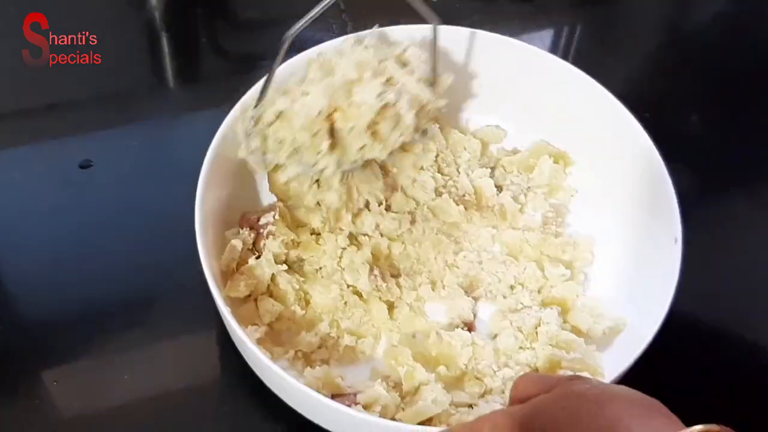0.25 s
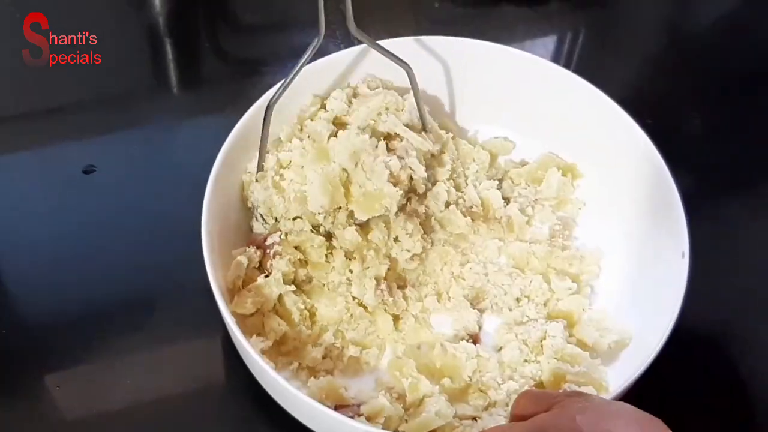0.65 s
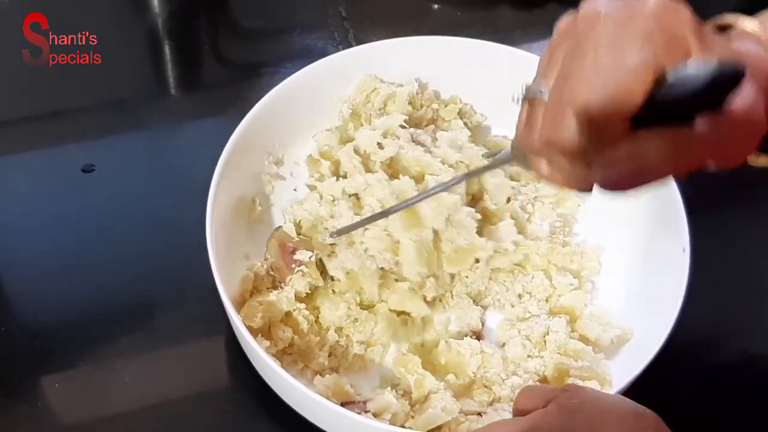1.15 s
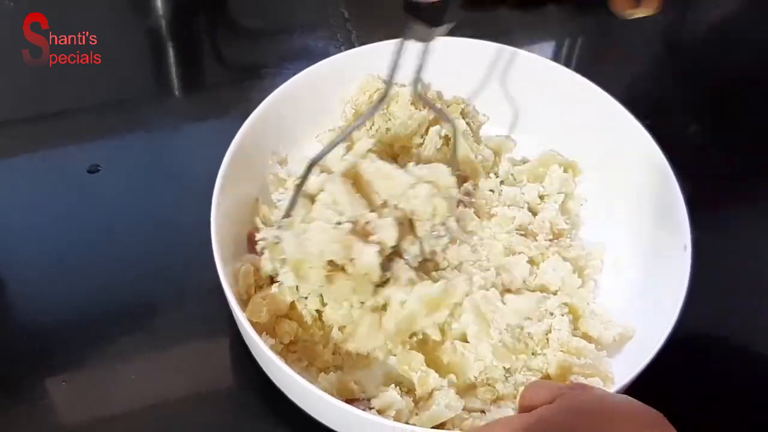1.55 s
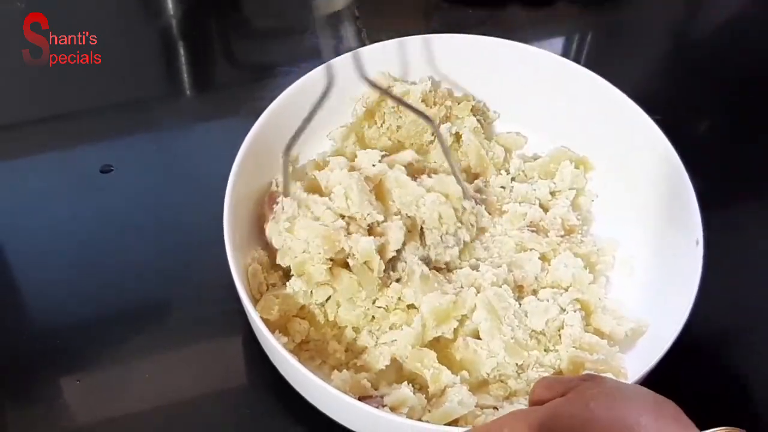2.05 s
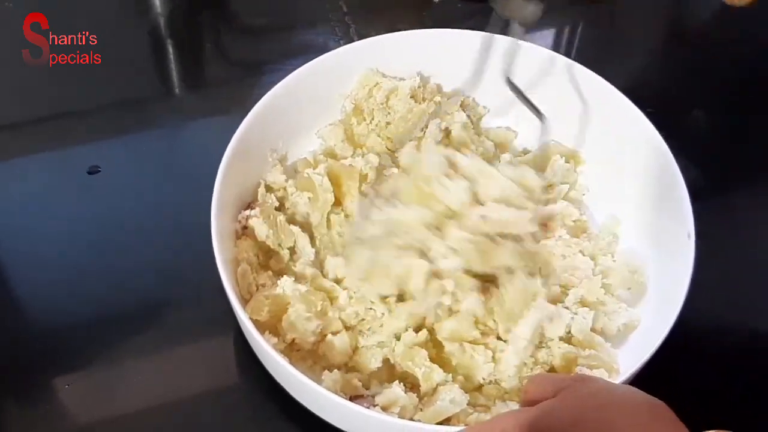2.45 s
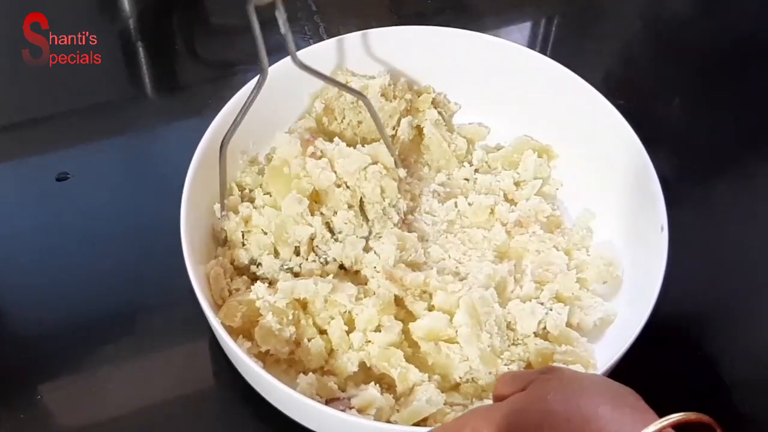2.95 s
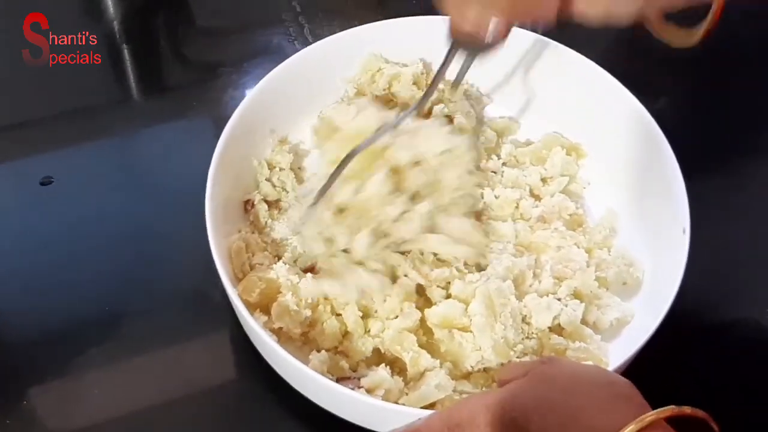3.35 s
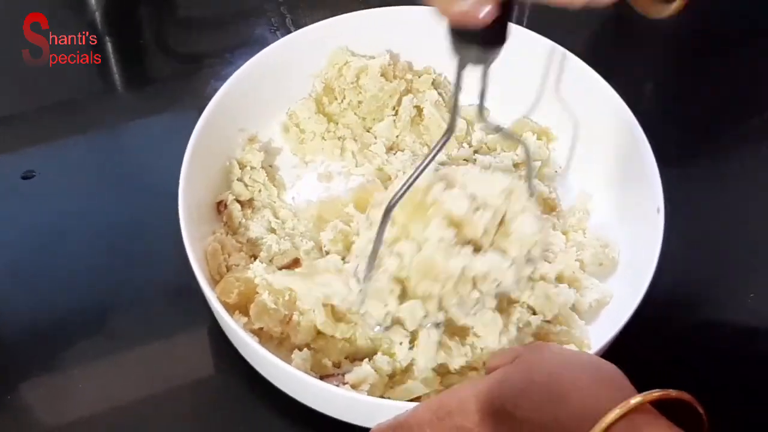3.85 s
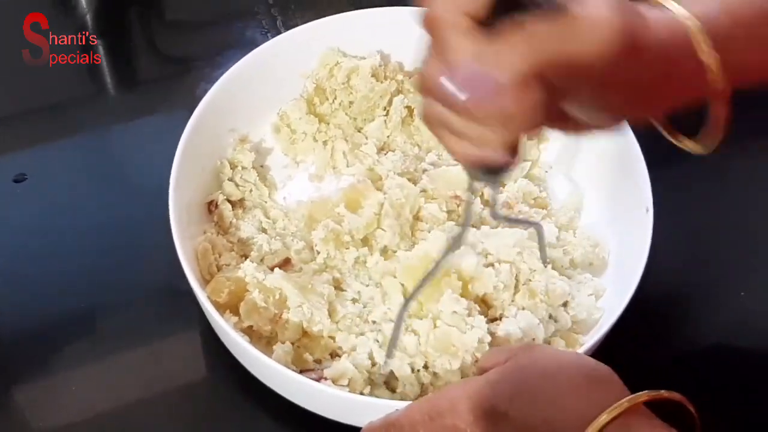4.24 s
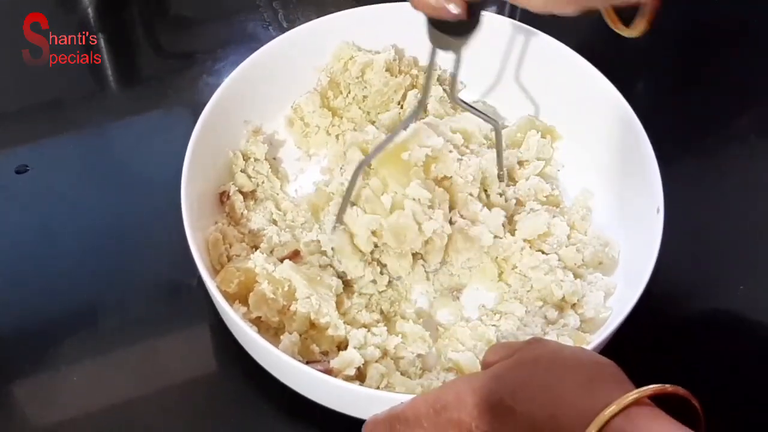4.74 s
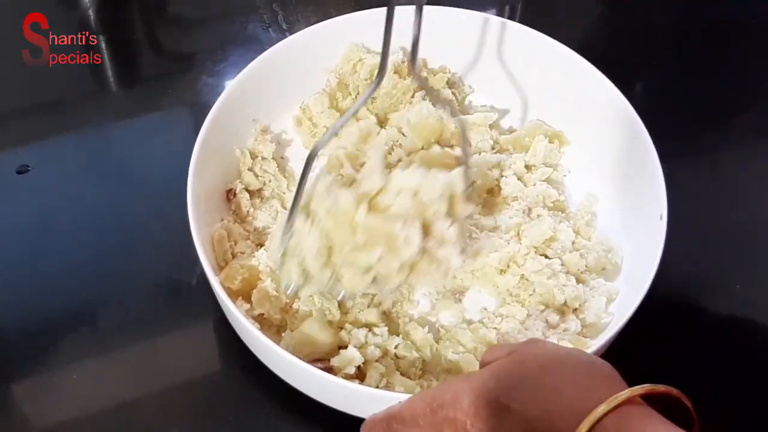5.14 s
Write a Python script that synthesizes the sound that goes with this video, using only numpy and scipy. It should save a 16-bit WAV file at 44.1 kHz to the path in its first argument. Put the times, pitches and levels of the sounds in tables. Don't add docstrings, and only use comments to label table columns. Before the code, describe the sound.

Potato mashing in a bowl: an early clack, quiet wet scrapes with faint bird whistles, then increasingly loud hollow knocks and a glaze squeak.

```python
import sys
import numpy as np
from scipy import signal
from scipy.io import wavfile
from scipy.ndimage import uniform_filter1d

SR = 44100
rng = np.random.default_rng(int(sys.argv[2]) if len(sys.argv) > 2 else 0)


def output_pcm(signal):
    pcm = np.clip(np.atleast_2d(signal).T, -1, 1) * 32767
    wavfile.write(sys.argv[1], SR, np.round(pcm).astype(np.int16))


def volts_from_decibels(level):
    exponent = np.asarray(level, float) / 20
    return 10 ** exponent


N = 237872


def rms_one(x):
    return x / np.sqrt(np.mean(x ** 2) + 1e-20)


def lean_left(db):
    return volts_from_decibels([[db], [-db]])


def at_hz(points, hz):
    point_hz, value = np.transpose(points)
    return np.interp(np.log(hz), np.log(point_hz), value)


def drift(rate):
    hop, settle = 40, 2000
    r = np.exp(-2 * np.pi * rate * hop / SR)
    white = rng.standard_normal(N // hop + settle + 2)
    slow = signal.lfilter([1], [1, -2 * r, r * r], white)[settle:]
    return np.interp(np.arange(N) / hop, np.arange(len(slow)), rms_one(slow))


def swells(rows, rise_db_s, fall_db_s):
    t = np.arange(0, N + 40, 40) / SR
    power = 0
    for s, hold, db in rows:
        early = np.maximum(s - t, 0)
        late = np.maximum(t - s - hold, 0)
        power = power + volts_from_decibels(db - rise_db_s * early - fall_db_s * late) ** 2
    return np.interp(np.arange(N) / SR, t, 10 * np.log10(power + 1e-14))


def resonate(x, hz, width_hz):
    r = np.exp(-np.pi * width_hz / SR)
    zeros = np.array([1, 0, -1]) * (1 - r * r) / 2
    poles = [1, -2 * r * np.cos(2 * np.pi * hz / SR), r * r]
    return signal.lfilter(zeros, poles, x + 1e-18)


def soften(x, low_hz, high_hz):
    return signal.sosfilt(signal.butter(2, [low_hz, high_hz], "band", fs=SR, output="sos"), x)


BAND_EDGES = 25 * 2 ** np.arange(0, 9.6, .5)


def stereo_bands(size, likeness, gain_at):
    out, white = 0, rng.standard_normal((2, 2, size))
    for k, (low, high) in enumerate(zip(BAND_EDGES, BAND_EDGES[1:])):
        mid, side = soften(white[k % 2], low, high)
        hz = np.sqrt(low * high)
        alike = np.clip(at_hz(likeness, hz), -1, 1)
        pair = np.sqrt(1 + alike) * mid + np.sqrt(1 - alike) * side * [[1], [-1]]
        out = out + gain_at(hz) * pair
    return out


# frequency in Hz, level in dB per Hz.
FLOOR = [(20, -40.5), (45, -18), (100, -17), (250, -3.5), (400, -24), (650, -37.5), (1200, -30.5),
         (2000, -33), (3000, -63.5), (6000, -58), (8500, -74.5), (13000, -47.5), (16000, -39.5)]
# frequency in Hz, likeness from 0 to 1.
FLOOR_LIKENESS = [(60, 1), (240, 0.99), (950, 0.28), (3770, 0.06), (15000, 0.124)]
# frequency in Hz, width in Hz, level in dB.
RUMBLE = [(55, 2.8, -77.5), (96.6, 3.9, -66), (161.2, 3.5, -60.5), (236.3, 5.5, -60.5), (286, 8, -78)]
# frequency in Hz, width in Hz, level in dB.
FAN = [(1200, 120, -84), (1980, 160, -79)]


def background():
    floor = stereo_bands(N, FLOOR_LIKENESS, lambda hz: volts_from_decibels(at_hz(FLOOR, hz)))
    broad = volts_from_decibels(-57.5) * rms_one(floor)
    common, apart = rng.standard_normal(N), rng.standard_normal((2, N))
    feed = common + 1.1 * apart
    hum = sum(volts_from_decibels(db) * rms_one(resonate(feed, hz, width)) for hz, width, db in RUMBLE + FAN)
    return lean_left(1.5) * (broad + hum)


# start in seconds, hold in seconds, level in dB.
MASH = [(0.0, 0.63, -69.5), (.9, 0.09, -61), (1.95, .05, -71.5), (2.1, .16, -66), (2.83, 0.063, -64.5),
        (3.05, 0.089, -67.5), (3.2, 0.071, -66), (3.4, 0.023, -66), (3.8, 0.076, -68.5), (4.33, 0.077, -61),
        (4.92, .02, -62), (5.3, 0.12, -73)]
# frequency in Hz, level in dB per Hz.
SQUELCH = [(1470, -41), (2500, -11), (3130, -10), (3860, -2.5), (5480, -3.5), (12200, -3.5), (16000, -4.5)]
# frequency in Hz, likeness from 0 to 1.
ROOM_LIKENESS = [(150, .9), (400, 0.87), (1000, 0.12), (10000, 0.054)]


def squelch():
    flicker = drift(15)
    noise = stereo_bands(N, ROOM_LIKENESS, lambda hz: volts_from_decibels(at_hz(SQUELCH, hz) + 1.2 * flicker))
    level_db = swells(MASH, rise_db_s=116, fall_db_s=119)
    return volts_from_decibels(level_db + 0.5) * rms_one(noise)


def slip_noise(level_db, resonances):
    slips = rng.standard_normal((2, N))
    wall = 0
    for hz, width, db in resonances:
        wall = wall + volts_from_decibels(db + 1.3 * drift(1.3)) * rms_one(resonate(slips, hz, width))
    return volts_from_decibels(level_db) * rms_one(wall)


# start in seconds, hold in seconds, singing in dB, dry scrape in dB.
RUBBING = [(.06, .06, -74, -60), (.82, .06, -89, -75), (0.967, 0.069, -83, -55),
           (1.272, 0.028, -80.5, -77.5), (2.099, 0.046, -73, -72), (2.292, 0.16, -64, -68),
           (2.566, .1, -63, -62), (2.72, 0.081, -60.5, -56), (3.144, 0.12, -72, -56.5),
           (3.422, 0.021, -57, -54.5), (3.617, 0.054, -59.5, -62.5)]
# frequency in Hz, width in Hz, level in dB.
SINGING = [(850, 57, 5.5), (1144, 22, 6.5)]
# frequency in Hz, width in Hz, level in dB.
SCRAPE = [(753, 400, -9), (1210, 140, 13.5), (2050, 220, 10)]


def rubbing():
    s, hold, singing, scraping = np.transpose(RUBBING)
    idle_db = -82.5

    def stroke_db(db):
        strokes = np.transpose([s, hold, db])
        return np.maximum(swells(strokes, rise_db_s=103, fall_db_s=134), idle_db)

    song = slip_noise(stroke_db(singing) + 2.5, SINGING)
    scrape = slip_noise(stroke_db(scraping) - 8.0, SCRAPE)
    return song + scrape


def struck(modes, times, levels_db, spread_db, rattle_s=0):
    at, out = np.round(times * SR).astype(int), np.zeros(N)
    chance = rng.standard_normal((len(at), len(modes)))
    wires = rng.standard_normal(N)
    for k, (hz, mode_db, t60) in enumerate(modes):
        clicks = np.zeros(N)
        strength = volts_from_decibels(levels_db + mode_db + spread_db * chance[:, k])
        np.add.at(clicks, at, strength * (-1) ** k)
        if rattle_s:
            fade = np.exp(-1 / (rattle_s * SR))
            clicks = wires * signal.lfilter([np.sqrt(1 - fade ** 2)], [1, -fade], clicks + 1e-18)
        r, w = volts_from_decibels(-60 / (max(t60, .0005) * SR)), 2 * np.pi * hz / SR
        out += signal.lfilter([0, np.sin(w)], [1, -2 * r * np.cos(w), r * r], clicks + 1e-18)
    return out


# start in seconds, bowl body in dB, weight passed to the counter in dB,
# hardness of contact in dB.
BLOWS = [(0.127, -70, 13.5, 16), (0.151, -39.5, -37, 9), (0.291, -36.5, -5, -34), (0.341, -26.5, -5, 13),
         (1.58, -51, 2.5, -29), (1.595, -48, -3.5, -22.5), (2.138, -74.5, 1.5, 16.5),
         (2.708, -35.5, 0, -12.5), (2.763, -42.5, -10, -0.5), (3.389, -30.5, -7.5, -15),
         (3.657, -16, -11.5, -10), (3.718, -27, -3.5, -8), (3.768, -27, -10, -18),
         (3.868, -19.5, -10.5, -7), (4.108, -11.5, -16, -4.5), (4.566, -23.5, -5.5, -10),
         (4.589, -25.5, -17.5, -9.5), (4.655, -7, -11, -9), (4.692, -36.5, 9, -0.5),
         (4.906, -33.5, -30, 2.5), (4.951, -11, -7.5, -4.5), (4.956, -41.5, -4, 6),
         (5.25, -21.5, -10, -15.5)]
# frequency in Hz, level in dB, t60 in seconds.
THUD = [(99, -35, 0.14), (170.5, -7.5, 0.07), (251, -1.5, 0.021), (313.2, 1.5, 0.074), (391.6, -4.5, 0.12),
        (467, -2.5, 0.07)]
# frequency in Hz, level in dB, t60 in seconds.
BODY = [(608, -4, 0.025), (690, 2.5, 0.016), (808, -6, 0.043), (910, -5, 0.024), (1033.6, -7.5, 0.09),
        (1157, 2, 0.0092), (1304.5, -0.5, 0.027)]
# frequency in Hz, level in dB, t60 in seconds.
RIM = [(1479, -2.5, 0.0095), (1751, 0, 0.0051), (1964, 0, 0.0087), (2400, -0.5, 0.0025),
       (2872, -4.5, 0.006), (2920, -0.5, 0.00088)]
# frequency in Hz, level in dB, t60 in seconds.
CRACK = [(3900, 0.5, 0.0018), (5300, 2, 0.0012), (6464, -1, 0.0015), (7670, -3.5, 0.00092),
         (11700, -6, 0.00089), (12960, -10, 0.00033)]


def blows():
    s, body_db, weight_db, hard_db = np.transpose(BLOWS)
    crack_per_hardness = 2.003
    thud = struck(THUD, s, body_db + weight_db - 6.5, spread_db=0.5)
    body = struck(BODY, s, body_db - 7.5, spread_db=1.5)
    rim = struck(RIM, s, body_db + hard_db + 5.0, spread_db=1.0)
    crack = struck(CRACK, s, body_db + crack_per_hardness * hard_db, spread_db=0.0, rattle_s=0.0035)
    low = soften(thud, 75, 912) + soften(body, 270, 1600)
    return low + soften(rim, 1300, 7100) + soften(crack, 4180, 16500)


def damped_sines(rows):
    out, t = np.zeros(N), np.arange(SR // 2) / SR
    for s, hz, db, t60 in rows:
        at = round(s * SR)
        envelope = volts_from_decibels(db - 60 * t / max(t60, .001)) * np.minimum(hz * t, 1)
        out[at:at + len(t)] += (envelope * np.sin(2 * np.pi * hz * t))[:N - at]
    return out


# start in seconds, level in dB.
BOOMS = [
    (.13, -40),
    (0.398, -34.5),
    (4.121, -37),
    (4.96, -45),
]


def booms():
    return damped_sines([(s, 106, db, 0.083) for s, db in BOOMS])


# start in seconds, frequency in Hz, level in dB,
# t60 in seconds.
SPOTS = [(.152, 2600, -17, 0.0071), (.152, 2130, -28, 0.027), (.341, 2050, -21, 0.024),
         (.341, 2400, -28.5, 0.069), (.341, 1660, -39, 0.02), (.341, 15520, -31.5, 0.044),
         (2.707, 365, -39, 0.078), (2.707, 910, -41.5, 0.088), (3.392, 394.6, -40, 0.17),
         (3.392, 910, -46, 0.14), (3.606, 700, -50, 0.057), (3.659, 298, -32.5, 0.1),
         (3.767, 387, -27.5, 0.1), (3.868, 653, -15, 0.031), (4.109, 743, -13.5, 0.02),
         (4.109, 566, -22, 0.086), (4.109, 3900, -23.5, 0.023), (4.567, 668, -24, 0.047),
         (4.59, 690, -33.5, 0.057), (4.655, 727, -4, 0.017), (4.66, 908, -19, 0.093),
         (4.66, 564, -24.5, 0.14), (4.689, 910, -15, 0.0059), (4.9075, 1955, -19.5, 0.015),
         (4.9075, 3700, -29.5, 0.0095), (4.951, 760, -10, 0.031), (4.956, 584, -13, 0.022),
         (4.9557, 3240, 0, 0.0018), (4.956, 2100, -18, 0.0046), (5.251, 392, -30.5, 0.17)]


def spots():
    return damped_sines(SPOTS)


# start in seconds, level in dB.
PINGS = [
    (0.34, -35),
]
# frequency in Hz, level in dB, t60 in seconds.
WIRE = [(4000, 6.5, 0.045), (4800, -9.5, 0.098), (5840, 9, 0.0083), (6300, -3, 0.14), (7800, 9, 0.11),
        (10600, 11, 0.02), (11926, 0.5, .05), (13200, -1.5, 0.073)]


def pings():
    return struck(WIRE, *np.transpose(PINGS), spread_db=2.0)


# start in seconds, length in seconds, starting frequency in Hz, level in dB.
BIRD = [
    (0.602, 0.08, 3900, -63.5),
    (0.813, .11, 3920, -57.5),
    (0.919, 0.09, 4010, -60),
    (1.04, 0.079, 3900, -60),
    (1.256, 0.1, 3900, -65.5),
    (1.487, 0.096, 3950, -68),
    (1.771, 0.057, 3800, -72.5),
    (2.39, 0.069, 3840, -73),
]


def bird():
    out, sag_hz_s = np.zeros(N), 3940
    for s, length, start_hz, db in BIRD:
        hz = np.linspace(start_hz, start_hz - sag_hz_s * length, round(length * SR))
        whistle = np.sin(2 * np.pi * np.cumsum(hz) / SR)
        out[round(s * SR):][:len(hz)] += volts_from_decibels(db) * np.sqrt(np.hanning(len(hz))) * whistle
    return out * (0.27 + 0.33 * drift(146))


# frequency in Hz, level in dB, t60 in seconds.
CLINK = [(1594, -43, 0.082), (2194, -38, 0.032), (2600, -49.5, 0.048), (3210, -58.5, 0.078),
         (4150, -54.5, 0.045), (4950, -66, 0.17), (5180, -54.5, 0.1), (9250, -76, 0.071)]


def clink():
    return damped_sines([(2.764, *mode) for mode in CLINK])


# start in seconds, hold in seconds, level in dB.
DRAG = [
    (3.16, 0.068, -54.5),
]
# frequency in Hz, width in Hz, level in dB.
DRAGGED = [(715, 400, -1), (920, 220, -1), (2600, 2000, -8)]


def drag():
    return slip_noise(swells(DRAG, rise_db_s=500, fall_db_s=141) - .3, DRAGGED)


# start in seconds, hold in seconds, level in dB.
SQUEAK = [
    [(4.25, 0.04, -46.5), (4.33, .06, -59), (4.43, 0.017, -60.5), (4.51, 0.13, -45)],
    [(4.38, 0.0039, -50.5), (4.415, 0.02, -46.5), (4.475, 0.014, -59), (4.495, 0.085, -54.5)],
]
SQUEAK_HZ = (1170, 1762)


def squeak():
    noise, out = rng.standard_normal(N), 0
    for rows, hz in zip(SQUEAK, SQUEAK_HZ):
        level_db = swells(rows, rise_db_s=910, fall_db_s=699) - 8.5
        out = out + volts_from_decibels(level_db) * rms_one(resonate(resonate(noise, hz, 75), hz, 102))
    return out


# frequency in Hz, t60 in seconds.
ROOM_T60 = [(150, 0.47), (400, 0.35), (1200, 0.37), (3600, 0.31), (10000, 0.29)]


def kitchen(x):
    t = np.arange(int(.9 * SR)) / SR
    tail = stereo_bands(len(t), ROOM_LIKENESS, lambda hz: volts_from_decibels(-60 * t / at_hz(ROOM_T60, hz)))
    build_up = np.clip((t - .002) / 0.0017, 0, 1)
    tail *= build_up * (1 + 0.2 * np.exp(-t / 0.053))
    tail /= np.sqrt(np.sum(tail ** 2, axis=1, keepdims=True))
    return signal.fftconvolve(x[None], tail, axes=1)[:, :N]


def shifting_kitchen(x, count=3):
    starts = np.array(BLOWS)[:, 0] - .003
    place = np.searchsorted(starts, np.arange(N) / SR) % count
    return sum(kitchen(x * uniform_filter1d(1. * (place == k), size=120)) for k in range(count))


def scene():
    bowl = soften(blows() + pings() + squeak(), 60, 16000)
    near = soften(booms() + spots() + clink(), 60, 22000)
    outside = bird()
    direct = lean_left(1.5) * (bowl + near + outside)
    to_room = bowl + .5 * near + 0.66 * outside
    room = volts_from_decibels(6.5) * lean_left(1.2) * shifting_kitchen(to_room)
    return direct + room + squelch() + rubbing() + drag() + background()


def top_cut(x):
    return signal.sosfilt(signal.butter(12, 17430, fs=SR, output="sos"), x)


def record(dry):
    low_pass = signal.ellip(10, .5, 50, 15850, fs=SR, output="sos")
    mix = signal.sosfilt(low_pass, dry)
    return top_cut(mix)


dry = scene()
out = record(dry)
output_pcm(out)
```